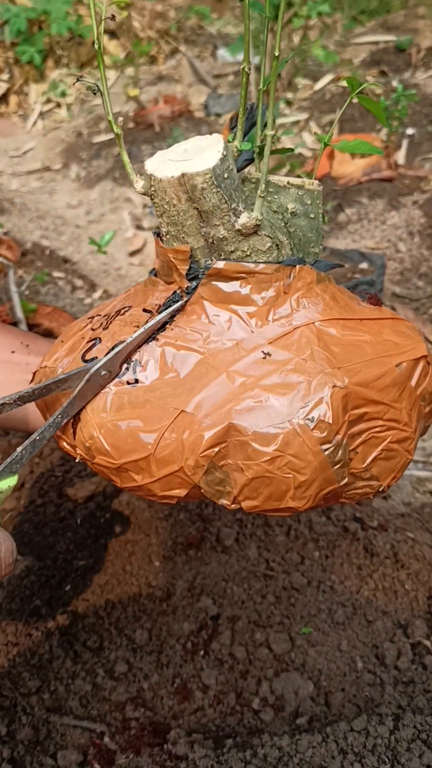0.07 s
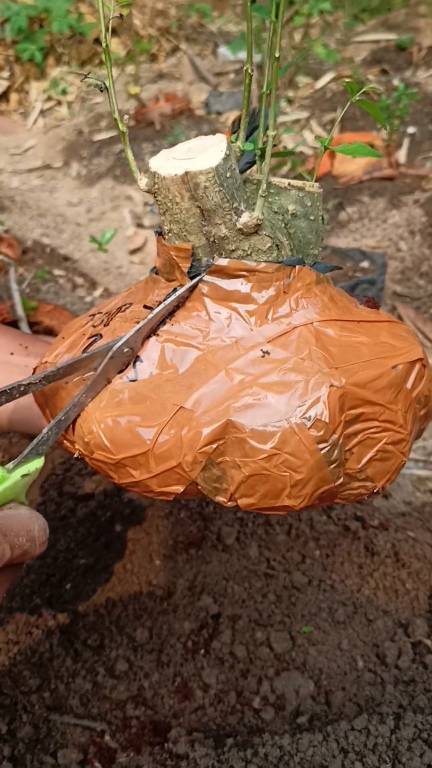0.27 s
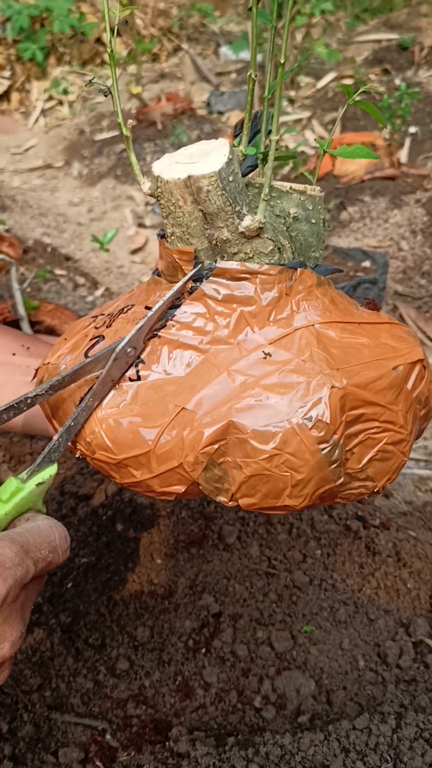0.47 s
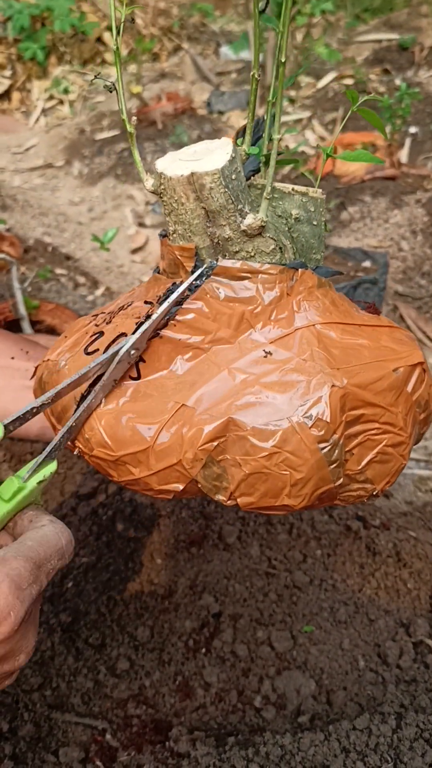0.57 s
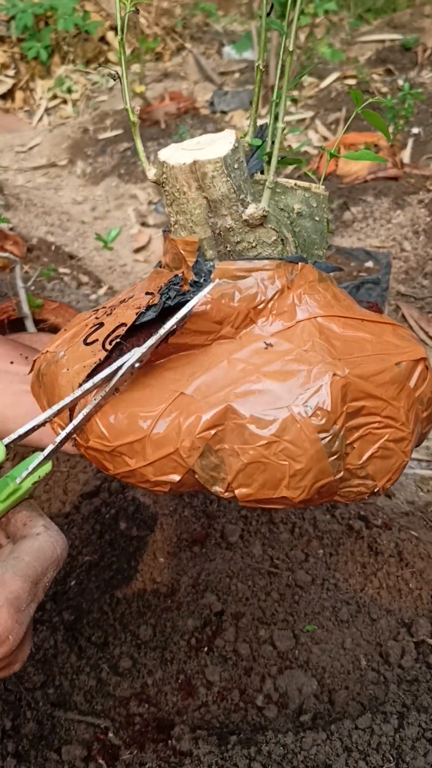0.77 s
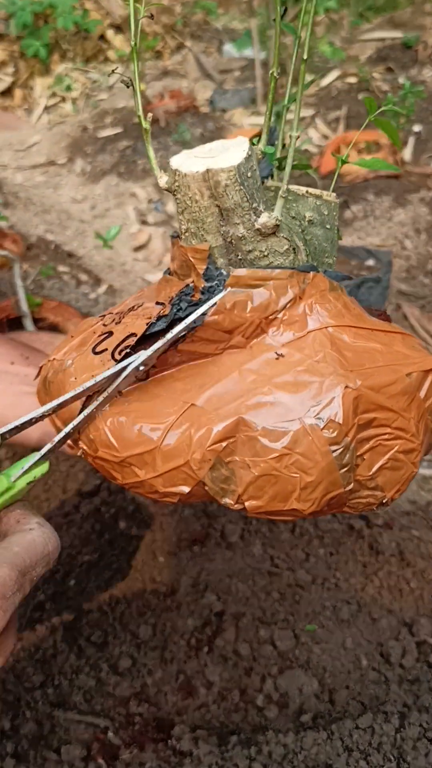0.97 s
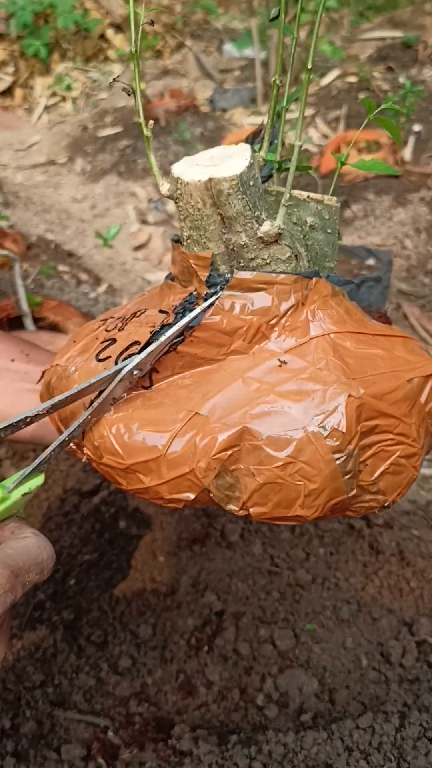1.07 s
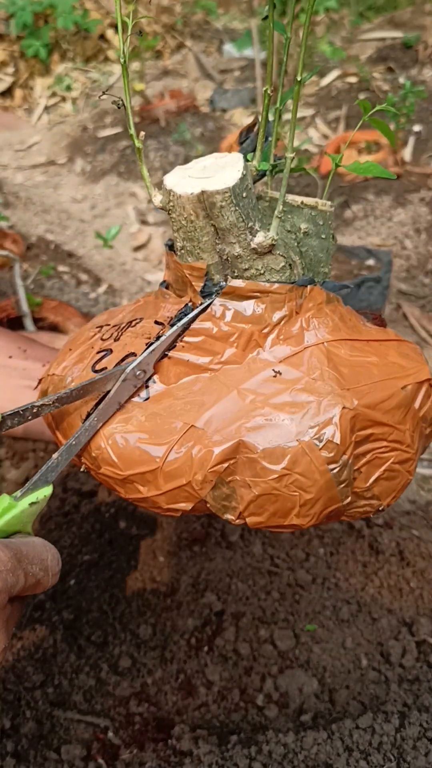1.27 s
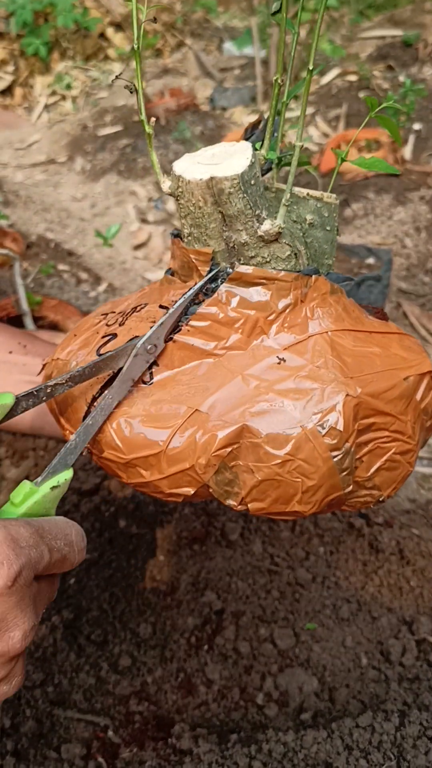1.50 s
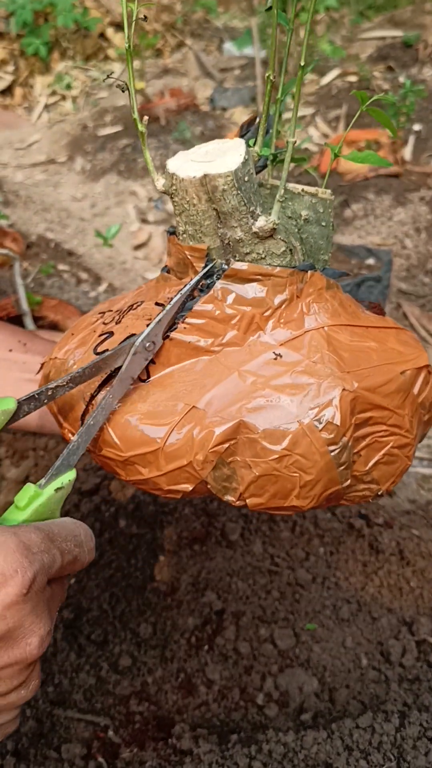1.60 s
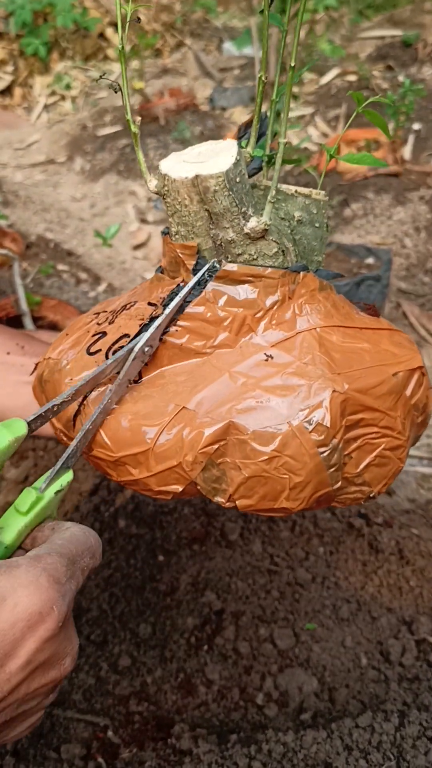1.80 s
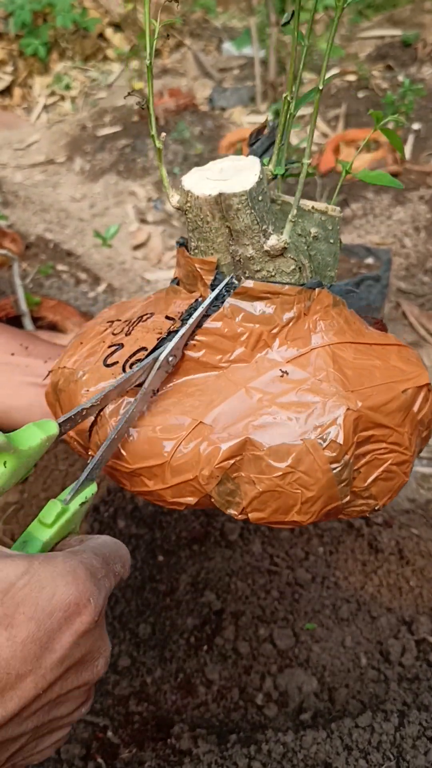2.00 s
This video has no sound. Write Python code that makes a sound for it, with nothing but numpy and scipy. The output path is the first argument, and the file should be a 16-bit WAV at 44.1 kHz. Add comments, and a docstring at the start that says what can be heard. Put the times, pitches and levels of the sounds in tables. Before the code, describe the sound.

Scissors cut through plastic tape close by, with sharp crinkles, snaps and one clack.

```python
"""Plastic tape crinkles and snaps close by as scissors work through it, outdoors.
The tape is wrapped round a ball of soil. The blades catch and slip on the film, which gives way in
sharp snaps; one cut ends with the clack of the blades closing. The handled bundle rumbles softly,
over a low hum, a thin steady whine, a far bird and faint open-air noise."""
import sys
import numpy as np
from scipy import signal
from scipy.fft import rfft, irfft
from scipy.io import wavfile

SR = 44100
rng = np.random.default_rng(int(sys.argv[2]) if len(sys.argv) > 2 else 0)


def store_wav(level_fs):
    """Save 16-bit WAV to argv[1]."""
    pcm = np.round(np.clip(np.atleast_2d(level_fs), -1, 1) * 32767)
    wavfile.write(sys.argv[1], SR, pcm.T.astype(np.int16))


N = 90404

# The bright tone colour of snaps and crinkles as the microphone picks them up.
# Each row: frequency in Hz, relative level in dB.
SNAP_COLOUR = [(200, -17), (1100, -22.5), (1600, -9.5), (2550, -19.5), (3150, -10.5), (3550, -14.5),
               (4100, -4), (5000, -4.5), (6200, -3.5), (7200, -6), (7800, -16), (8200, -10.5),
               (8600, -17.5), (9050, -10), (10800, -19.5), (12600, -12), (13600, -33), (15000, -15)]
# The tone colour of soil scuffing under the wrap. Each row: frequency in Hz, relative level in dB.
SOIL_COLOUR = [(100, -3.5), (250, -2.5), (600, -3.5), (1200, -10.5), (2200, -11.5), (5000, -7),
               (15000, -26)]


def from_db(db):
    """Turn decibels into a number to multiply by."""
    return 10 ** (np.asarray(db) / 20)


def rms_one(x):
    """Scale a sound so that its average level (rms) is 1."""
    return x / np.sqrt(np.mean(x ** 2) + 1e-20)


def in_time(rows):
    """Join (seconds, value) points with straight lines."""
    return np.interp(np.arange(N) / SR, *np.transpose(rows))


def coloured(x, spectrum, size=4096):
    """Give a sound the tone colour set by (Hz, dB) points."""
    hz, db = np.transpose(spectrum)
    grid_hz = np.maximum(np.fft.rfftfreq(size, 1 / SR), 1)
    gain = from_db(np.interp(np.log(grid_hz), np.log(hz), db))
    # Fold the filter so that it rings only after a sound, never before it.
    cepstrum = irfft(np.log(gain))
    cepstrum[1:size // 2] *= 2
    cepstrum[size // 2 + 1:] = 0
    response = irfft(np.exp(rfft(cepstrum)))
    return signal.fftconvolve(x, response)[:len(x)]


def resonate(x, hz, width_hz):
    """Let through a band around one pitch, so that clicks ring there."""
    r = np.exp(-np.pi * width_hz / SR)
    feedback = [1, -2 * r * np.cos(2 * np.pi * hz / SR), r * r]
    return signal.lfilter((1 - r * r) / 2 * np.array([1, 0, -1]), feedback, x + 1e-18)


def noise(spectrum):
    """Steady noise with a given tone colour, at average level 1."""
    return rms_one(coloured(rng.standard_normal(N), spectrum))


def drift(rate_hz):
    """A smooth random wander, typically about 1 in size."""
    r = np.exp(-2 * np.pi * rate_hz / SR)
    wander = signal.lfilter([1], [1, -2 * r, r * r], rng.standard_normal(N + SR))
    return rms_one(wander[SR:])


def tone(hz, waver, waver_hz=13):
    """A pure tone that wavers in loudness and phase, at average level 1."""
    swing = 1 + waver * (drift(waver_hz) + 1j * drift(waver_hz))
    return rms_one(np.real(swing * np.exp(2j * np.pi * hz * np.arange(N) / SR)))


def swell(peak_s):
    """A loudness curve that rises to a peak and dies away."""
    age = np.arange(N) / SR / peak_s
    return age * np.exp(-age)


def grains(per_s, spread_db, spectrum):
    """Random tiny clicks of uneven size, at average level 1."""
    sizes = from_db(spread_db * np.minimum(rng.exponential(1, N), 4))
    signs = rng.choice([-1, 1], N)
    happens = rng.random(N) < per_s / SR
    return rms_one(coloured(sizes * signs * happens, spectrum))


def click(tail_db, tail_s, size=2600):
    """A sharp tick, its echo off the wrap close by and a short dying shiver."""
    t = np.arange(size) / SR
    tail = rng.standard_normal(size) * np.exp(-t / tail_s)
    echo_s = 0.000875 * rng.uniform(0.834, 1.2)
    echo = 0.23 * np.sinc((t - echo_s) * SR)
    return (t == 0) + echo + from_db(tail_db) * tail / np.linalg.norm(tail)


def add(out, start_s, sound, peak_db):
    """Mix a sound in at a given time and peak level."""
    i = int(start_s * SR)
    out[i:i + len(sound)] += (from_db(peak_db) * sound / np.abs(sound).max())[:N - i]


def background():
    """Open air, the wavering hum of a distant motor and a thin whine."""
    # The motor's tones. Each row: pitch in Hz, average level in dB, waver as a share of the tone.
    motor_tones = [(91.5, -67, 0.48), (182, -73, 0.56)]
    # The tone colour of the open air. Each row: frequency in Hz, relative level in dB.
    air_colour = [(22, -36), (34, -8.5), (47, 3.5), (62, -1.5), (140, 2.5), (260, -7.5), (600, -10),
                  (1100, -18), (2400, -23.5), (3200, -22.5), (4500, -28), (6500, -30), (7700, -29),
                  (8300, -27), (11000, -35.5), (12600, -37), (14000, -27), (15000, -32)]
    # How loud the whine is. Each row: time in seconds, average level in dB.
    whine_levels = [(0, -71.5), (1.45, -70.5), (1.7, -78.5), (2.05, -81.5)]
    hum = sum(from_db(db) * tone(hz, waver) for hz, db, waver in motor_tones)
    air = from_db(-65) * noise(air_colour)
    whine = from_db(in_time(whine_levels)) * tone(hz=1505, waver=0.13)
    return air + hum + whine


def bird():
    """A far bird's faint falling whistles, blurred by distance."""
    # The whistles. Each row: start in seconds, peak level in dB.
    whistles = [(1.391, -67), (1.59, -71), (1.87, -69)]
    start_hz, fall_hz_per_s, length_s = 3610, 4800, 0.11
    t = np.arange(int(length_s * SR)) / SR
    cycles = (start_hz - 0.5 * fall_hz_per_s * t) * t
    note = np.sin(np.pi * t / length_s) * np.sin(2 * np.pi * cycles)
    out = np.zeros(N)
    for start_s, db in whistles:
        blur = 1 + drift(rate_hz=60)[:len(t)]
        add(out, start_s, note * blur, db)
    return out


def handling():
    """The bundle is pushed about: a dull rumble, soft thumps and scuffs."""
    # How loud the rumble is. Each row: time in seconds, average level in dB.
    rumble_levels = [(0, -76.5), (0.22, -79), (0.265, -54), (0.35, -61), (0.47, -59.5), (0.54, -62),
                     (0.67, -56), (0.78, -54), (0.9, -58.5), (1.0, -65.5), (1.25, -71), (1.4, -57.5),
                     (1.49, -62), (1.56, -71), (2.05, -68.5)]
    # The tone colour of the rumble. Each row: frequency in Hz, relative level in dB.
    rumble_colour = [(22, -40), (34, -13), (48, -1), (90, -1), (180, -0.5), (260, -12), (600, -13.5),
                     (2000, -48.5)]
    # Nudges to the bundle. Each row: start in seconds, peak level in dB.
    thumps = [(.246, -49), (.458, -48.5), (.660, -48.5), (.768, -46), (0.824, -47.5), (.885, -44)]
    # Soil shifting under the wrap. Each row: start in seconds, peak level in dB, centre pitch in Hz.
    scuffs = [(0.314, -53, 493), (1.135, -59, 1090), (1.193, -56.5, 1100), (1.483, -52, 497)]
    out = from_db(in_time(rumble_levels)) * noise(rumble_colour)
    for start_s, db in thumps:
        add(out, start_s, noise(rumble_colour) * swell(peak_s=0.018), db)
    for start_s, db, hz in scuffs:
        scuff = resonate(noise(SOIL_COLOUR), hz, width_hz=510)
        add(out, start_s, scuff * swell(peak_s=0.011), db)
    return out


def crinkles(per_s=420, pitches=10):
    """Small creases flip at random, each ringing briefly at one of several high pitches."""
    out = np.zeros(N)
    for hz in np.geomspace(4130, 7040, pitches):
        flips = grains(per_s / pitches, spread_db=3.5, spectrum=SNAP_COLOUR)
        out += flips + from_db(16) * resonate(flips, hz, width_hz=970)
    return rms_one(out)


def rubbing():
    """The blades catch and slip on the film, crinkle it and crunch through it; soil scuffs beneath."""
    # How strongly the blades rub. Each row: time in seconds, base level in dB.
    rub_levels = [(0, -82), (0.035, -79), (0.062, -55), (0.1, -61.5), (0.17, -56), (0.225, -50.1),
                  (0.255, -43.5), (0.295, -53.5), (0.345, -74), (0.385, -55.5), (0.45, -53.5), (0.505, -66),
                  (0.53, -58), (0.56, -73), (0.61, -49), (0.635, -53), (0.7, -48.5), (0.77, -45.5),
                  (0.805, -45.5), (0.835, -56.5), (0.875, -52), (0.895, -53), (0.915, -47), (0.95, -56.5),
                  (0.965, -72), (1.0, -70), (1.06, -61), (1.15, -53.5), (1.175, -63.5), (1.21, -51),
                  (1.255, -65), (1.3, -53), (1.365, -47.5), (1.395, -51), (1.41, -58.5), (1.445, -71),
                  (1.485, -55), (1.53, -73.5), (1.57, -64), (1.67, -80), (1.695, -71.1), (1.715, -57.5),
                  (1.77, -77), (1.87, -68), (1.93, -76.5), (2.0, -59), (2.05, -75.5)]
    # The tone colour of a blade sliding on film. Each row: frequency in Hz, relative level in dB.
    slide_colour = [(200, -19.5), (600, -16), (1200, -14), (1600, -7.5), (2550, -17), (3150, -7),
                    (3550, -12), (4100, -4), (4800, 1.5), (5500, -7.5), (6100, 4.5), (7100, -14.5),
                    (7800, -20.5), (9000, -20), (10800, -29.5), (12700, -23.5), (13600, -17),
                    (15000, -26.5)]
    # The tone colour of tape layers being cut. Each row: frequency in Hz, relative level in dB.
    crunch_colour = [(200, -7), (800, 0.5), (1600, 3), (2500, -1), (3200, 2), (6000, -11), (9000, -7),
                     (11000, -13), (15000, -6)]
    cut_start_s, cut_end_s, fade_s = 0.622, 0.82, 0.036
    t = np.arange(N) / SR
    cutting = np.clip(np.minimum(t - cut_start_s, cut_end_s - t) / fade_s, 0, 1)
    catch_and_slip = from_db(-1.5 + 2.0 * drift(rate_hz=120))
    slide = catch_and_slip * grains(per_s=9000, spread_db=4.5, spectrum=slide_colour)
    crinkle = from_db(-4) * crinkles()
    crunch = from_db(-9) * cutting * grains(per_s=760, spread_db=4, spectrum=crunch_colour)
    rub_db = in_time(rub_levels)
    soil_db = -66 + 0.37 * (rub_db - rub_db.mean())   # rises and falls gently with the rubbing
    soil = from_db(soil_db) * grains(per_s=2500, spread_db=3.0, spectrum=SOIL_COLOUR)
    return from_db(rub_db) * (slide + crinkle + crunch) + soil


def film_snaps():
    """The film gives way in sharp snaps, each ringing very briefly at its own pitch."""
    # The snaps. Each row: start in seconds, level in dB, ring pitch in Hz, then the boost or cut
    # in dB for the body (lower frequencies) and for the top (highest frequencies).
    snaps = [(.0730, -28.5, 5900, 2, 2), (.1001, -47, 6000, 3, -4), (.1869, -34.5, 5800, -15, -7),
             (.2402, -38, 5470, 2.5, -8), (0.2402, -30, 4760, 3, -6), (0.2628, -32, 5400, 9, -8),
             (0.273, -41, 5750, -12, -8), (0.278, -31.5, 5300, -8, -7), (0.2879, -28, 5700, 1, -8),
             (0.2895, -36, 6000, 0, 6), (.3180, -32, 5560, 4, -2), (0.375, -38, 5530, -7, -7),
             (.3902, -39, 6000, -12, 0), (.4190, -35.5, 5030, -8, -6), (0.4405, -26, 6260, 12, -1.5),
             (.4648, -24, 5900, 6.5, 2.5), (0.5278, -34.5, 4440, -8, -8), (.6099, -22.5, 6000, 1, 0.5),
             (.6731, -27, 5860, -4, -1), (0.684, -31, 5400, 2, -3), (0.7002, -17.5, 5960, 5.5, 2),
             (.7060, -24, 5270, 5, -3), (0.711, -26, 5600, 7, -2), (.7205, -35, 6000, 3, 11),
             (0.7338, -16, 6150, 5.5, 2.5), (.7399, -22.5, 6460, 9, 5), (0.7498, -24, 4940, -6, -5),
             (0.7546, -23.5, 5640, -1, -6), (0.7695, -26, 5500, 6, 1), (.7780, -18, 6150, 0.5, -6),
             (0.781, -33, 5300, 12, -3), (0.8006, -23.5, 5070, 4, 5), (.8030, -28, 6000, 7, 0),
             (0.8248, -38, 6000, 2, 9), (0.8506, -16.5, 5900, -1.5, 0), (0.8549, -21.5, 6100, 7, 1),
             (0.8786, -27.5, 6000, 5, -5), (0.8993, -30, 6000, 0, -6), (0.946, -33.5, 5830, 7, 14),
             (1.0177, -42, 5400, -2, -5), (1.0543, -31.5, 5600, 0, -12), (1.0637, -37, 5700, 2, -10),
             (1.0916, -37, 6170, 0, -7), (1.1365, -34, 5460, -4, -4), (1.1602, -33, 5330, 5.5, -3),
             (1.3496, -32, 5230, -12, -8), (1.3497, -36, 5230, 0, -6), (1.3877, -30, 5760, 7.5, -1.5),
             (1.3981, -35.5, 5600, 13, -3), (1.4855, -20.5, 6560, -1.5, 0), (1.5825, -47, 6050, -5, 7),
             (1.6026, -39, 6360, 12.5, 0), (1.6258, -39.5, 4100, 3, 1.5), (1.7460, -47, 5000, 0, -2),
             (1.7531, -42.5, 6800, -6, 3), (1.772, -44, 4300, 9, 3), (1.7847, -44.5, 4840, 3, -3),
             (1.8016, -33, 4100, -6, 2.5), (1.8278, -45, 5530, 8, 3), (1.8980, -43.5, 4150, -2, 4.5),
             (1.9530, -46, 5070, 1, 1), (1.9810, -42, 5800, 8, 2), (2.0001, -43.5, 5000, 17.5, -3)]
    body_below_hz, top_above_hz, ring_db, trim_db = 3700, 7740, 10.5, -0.5
    out = np.zeros(N)
    for start_s, db, ring_hz, body_db, top_db in snaps:
        colour = [(hz, base_db + body_db * (hz < body_below_hz) + top_db * (hz > top_above_hz))
                  for hz, base_db in SNAP_COLOUR]
        snap = coloured(click(tail_db=-9, tail_s=0.0018), colour)
        ring = from_db(ring_db) * resonate(snap, ring_hz, width_hz=1570)
        add(out, start_s, snap + ring, db + trim_db)
    return out


def blades_closing():
    """The blades shut with a hard clack and small rebounds; the clack trails off in a brief falling zip."""
    # The clack and its rebounds. Each row: start in seconds, peak level in dB.
    clacks = [(.9049, -8.5), (.9087, -35), (0.9097, -21.5), (0.9145, -26.5)]
    # The tone colour of the blades meeting. Each row: frequency in Hz, relative level in dB.
    clack_colour = [(200, -40), (700, -20), (1200, -17), (1600, -3), (2500, -14.5), (3000, -4),
                    (4000, -3.5), (5100, 2.5), (6400, 0), (7800, -14), (9100, -12.5), (10500, -21.5),
                    (15000, -29)]
    out = np.zeros(N)
    for start_s, db in clacks:
        add(out, start_s, coloured(click(tail_db=-8.5, tail_s=0.0083), clack_colour), db)
    zip_hz = np.geomspace(1710, 457, int(0.0088 * SR))
    zip_fade = np.sqrt(np.hanning(len(zip_hz)))
    zip_tone = np.sin(2 * np.pi * np.cumsum(zip_hz) / SR)
    add(out, start_s=0.9065, sound=zip_fade * zip_tone, peak_db=-46)
    return out


def scene():
    """All the sounds together in one channel."""
    scissors = film_snaps() + blades_closing() + rubbing()
    return (scissors + handling() + bird() + background())[None]


def record(dry):
    """Cut away the deepest bass and the highest treble."""
    bass_cut = signal.butter(4, 36, "high", fs=SR, output="sos")
    treble_cut = signal.ellip(10, 0.2, 75, 15500, fs=SR, output="sos")
    return signal.sosfilt(treble_cut, signal.sosfilt(bass_cut, dry))


dry = scene()
out = record(dry)
store_wav(out)
```